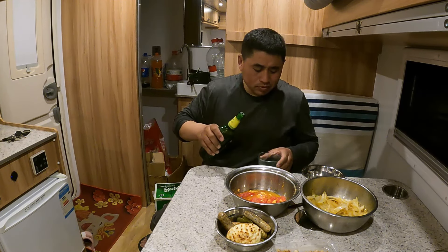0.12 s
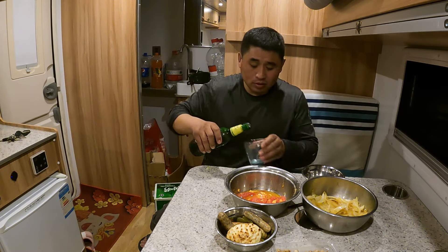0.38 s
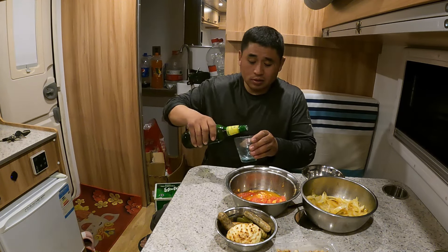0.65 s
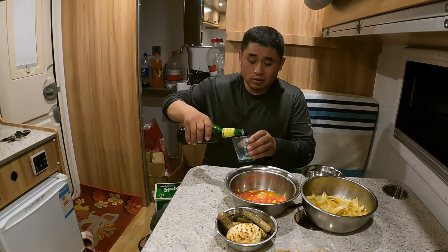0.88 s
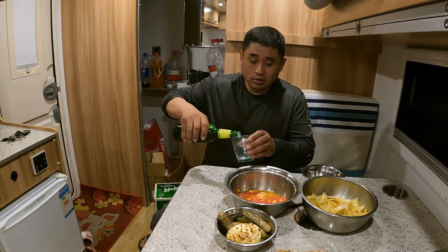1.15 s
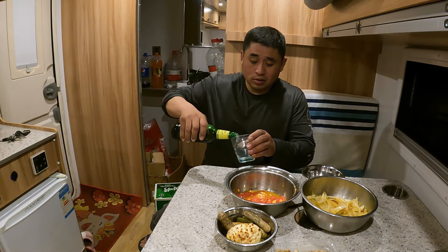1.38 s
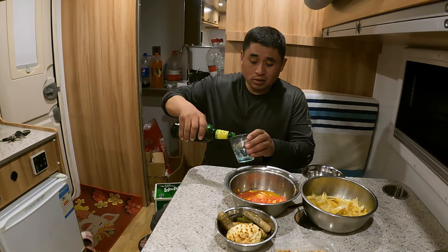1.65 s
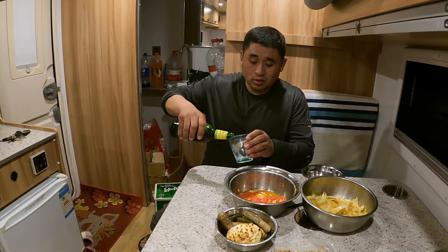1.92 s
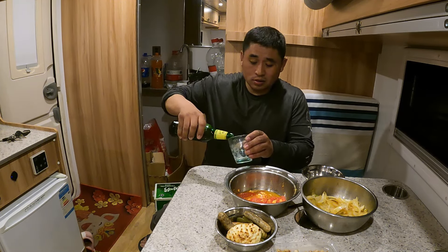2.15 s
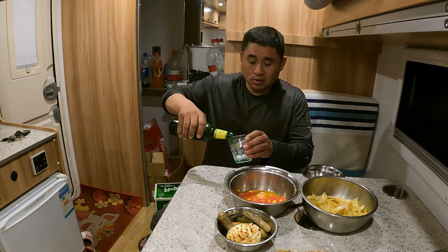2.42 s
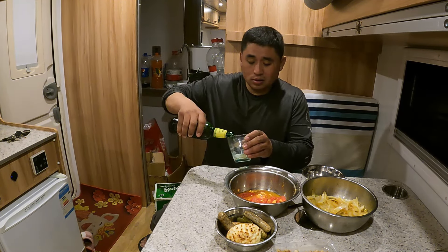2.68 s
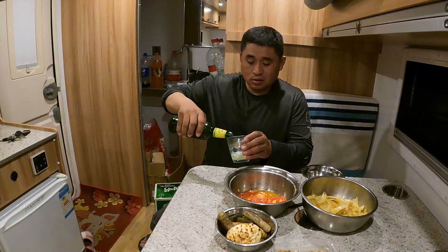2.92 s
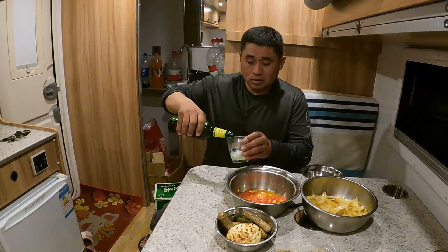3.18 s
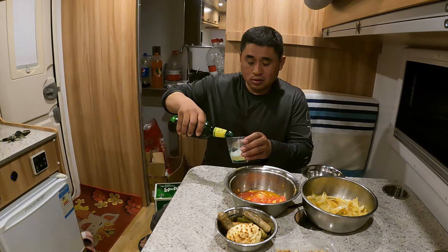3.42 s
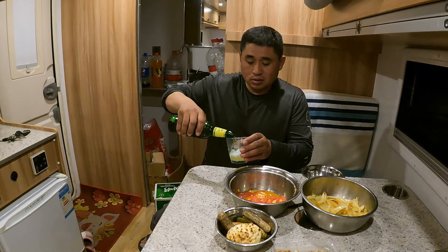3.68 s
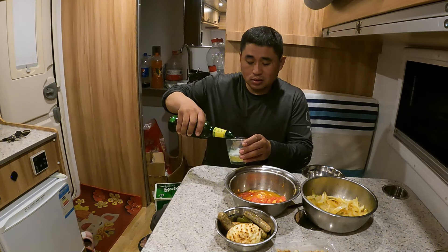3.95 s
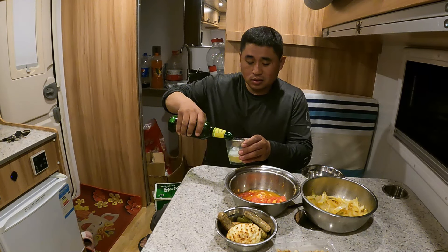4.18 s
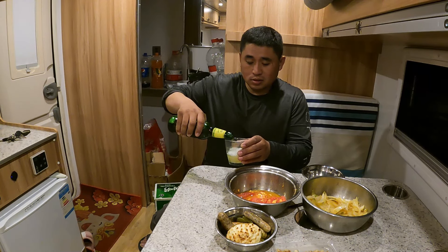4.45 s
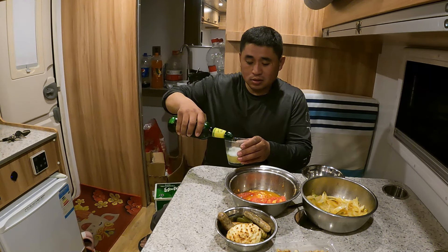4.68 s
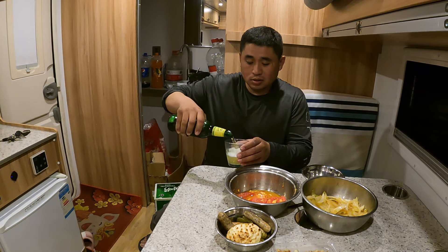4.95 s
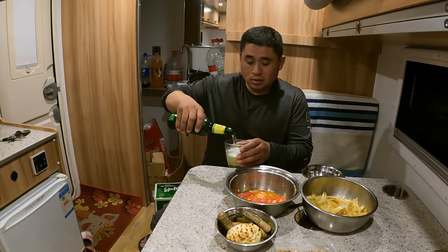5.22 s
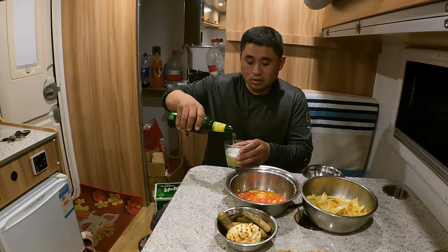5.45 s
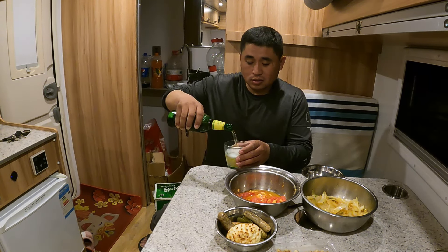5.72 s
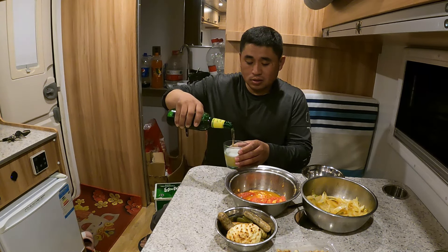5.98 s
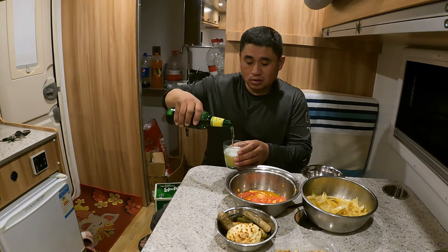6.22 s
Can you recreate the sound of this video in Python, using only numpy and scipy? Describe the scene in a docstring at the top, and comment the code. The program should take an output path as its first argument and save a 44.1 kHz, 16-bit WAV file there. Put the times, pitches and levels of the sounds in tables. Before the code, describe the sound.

A hard object thuds on a table and bounces once, then a bottle neck clinks on a glass and beer trickles faintly in a small hushed cabin.

```python
"""A small wood-lined cabin: a short bright scrape and faint glass hums, then a hard object is put down
on the table and bounces once (damped modes and booms). Beer is then poured slowly from a bottle into
a tilted glass: the neck clinks on the rim (ring groups), short ticks pop between (damped cavities),
soft taps fall on the table, and from 2.2 s the stream trickles faintly (rising bubbles).
Room hush, drone and low rumble (shaped noise) lie under all of it."""
import sys
import numpy as np
from scipy import signal
from scipy.fft import rfft, irfft
from scipy.io import wavfile
from scipy.ndimage import uniform_filter1d

SR = 44100
rng = np.random.default_rng(int(sys.argv[2]) if len(sys.argv) > 2 else 0)


def gain_from_decibels(decibels):
    """Convert decibel values to linear amplitude factors."""
    exponent = np.asarray(decibels, float) / 20
    return 10 ** exponent


def transcribe(signal):
    """Save signal, clipped to [-1, 1], as a 16-bit WAV file at the path in sys.argv[1]."""
    frames = np.atleast_2d(signal).T
    limited = np.clip(frames, -1, 1)
    pcm = np.round(limited * 32767).astype(np.int16)
    wavfile.write(sys.argv[1], SR, pcm)


N = 280035

# Likeness of left and right in noise and echoes. Each row: frequency in Hz, likeness from 0 to 1.
LIKENESS = [(60, .97), (250, .93), (600, .88), (1200, .8), (2000, .68), (4000, .65), (6500, .82),
            (8500, .94), (10300, .82), (12500, .15)]


def evened(x):
    """Scales to unit rms."""
    return x / np.sqrt(np.mean(x ** 2) + 1e-20)


def peaked(x, db):
    """Scales to a peak in dB."""
    return gain_from_decibels(db) * x / abs(x).max()


def read(points, hz):
    """Reads a (Hz, value) table on a log frequency axis."""
    f, value = np.transpose(points)
    return np.interp(np.log(hz + 1), np.log(f + 1), value)


def curve(points):
    """A (seconds, value) table at every sample."""
    return np.interp(np.arange(N) / SR, *np.transpose(points))


def add(mix, s, sound):
    """Adds a sound at s seconds, cut at the end of the mix."""
    part = mix[round(s * SR):][:len(sound)]
    part += sound[:len(part)]


def hump(hz, centre_hz, width_hz):
    """A steep resonance curve."""
    return 1 / (1 + (2 * (hz - centre_hz) / width_hz) ** 2)


def ring(hz, db, t60, rise=0.00046):
    """A dying sine that swells in while the contact lasts; t60 and rise in seconds."""
    t = np.arange(SR // 2) / SR
    swell = 1 - np.exp(-(t / rise) ** 2)
    return swell * gain_from_decibels(db - 60 * t / t60) * np.sin(2 * np.pi * hz * t)


def burst(colour, t60):
    """A puff of noise of the given magnitude spectrum that dies by 60 dB in t60 seconds."""
    t = np.arange(SR // 2) / SR
    puff = irfft(rfft(rng.standard_normal(len(t))) * colour)
    return evened(puff) * gain_from_decibels(-60 * t / t60)


def chatter(seconds, count):
    """One contact followed by a few weaker random ones."""
    out = np.zeros(round(.05 * SR))
    when, size = rng.random(count), rng.standard_normal(count)
    np.add.at(out, (when * seconds * SR).astype(int), 0.4 * size * (1 - when))
    out[0] = 1
    return out / np.linalg.norm(out)


def lumps(seconds):
    """Slow random drift of unit rms."""
    size = round(seconds * SR)
    return evened(uniform_filter1d(uniform_filter1d(rng.standard_normal(N), size), size))


def noise(gain, patchy_db, size=1024):
    """Stereo noise from random short-time spectra, gain(Hz) in magnitude, with drifting patches."""
    # Left-right balance of the noise. Each row: frequency in Hz, left minus right in dB.
    balance = [(60, 1.7), (180, 2), (550, 0), (1650, 4), (4970, 2.1), (8500, 1), (10500, 1.5),
               (13000, 11.5)]
    frames, hz = 4 * N // size + 5, np.fft.rfftfreq(size, 1 / SR)
    a, b, c, d, patches = rng.standard_normal((frames, len(hz), 5)).T
    patches = uniform_filter1d(patches, size=12, axis=0)
    patches = evened(uniform_filter1d(patches, size=10, axis=1))
    alike = read(LIKENESS, hz)[:, None]
    left, other = a + 1j * b, c + 1j * d
    z = np.array([left, alike * left + np.sqrt(1 - alike ** 2) * other])
    z *= gain(hz)[:, None] * gain_from_decibels(patchy_db * patches)
    z *= gain_from_decibels(np.outer([.5, -.5], read(balance, hz)))[:, :, None]
    return evened(signal.istft(z, nperseg=size, noverlap=3 * size // 4)[1][:, :N])


def knocks():
    """A blunt blow: a few cycles of the object itself, then the table top rings and booms."""
    # Knocks on the table. Each row: start in seconds, blow peak in dB, boom in dB re that peak.
    knock_rows = [(0.131, -33.5, -50), (0.1425, -7, -26), (0.276, -12, -30.5)]
    # Modes the blow sets ringing; the strongest lies near 1.1 kHz. Each # row: frequency in Hz, level in dB re
    # the other modes, t60 in seconds.
    knock_modes = [(143.5, -36, 0.18), (293, -5.5, 0.28), (460, -39, 0.75), (599.4, 3.5, 0.14),
                   (685, -8, 0.25), (923, -3, 0.063), (1080, 16, 0.046), (1240, -20.5, 0.27),
                   (1340, -1.5, 0.11), (1445, -66, 4), (1720, -26.5, 0.41), (2120, -41, 0.2),
                   (2100, -35.5, 0.15), (2270, -50, 0.17)]
    # Faint singing of the handled glass. Each row: start in seconds, frequency in Hz, level in dB,
    # t60 in seconds.
    hum_rows = [(0.024, 4700, -42, 0.067), (.075, 6100, -54, 0.12), (.085, 3523, -64.5, 0.48),
                (.215, 1580, -32.5, 0.14)]
    blow = ring(1175, 0, 0.011, rise=0.00045) + ring(1663, -2.6, 0.013, rise=0.00067)
    blow += ring(2350, -2.5, .006, rise=0.0022)
    body = blow + gain_from_decibels(-26) * sum(ring(*mode) for mode in knock_modes)
    soft = signal.convolve(body, signal.windows.hann(20))[:len(body)]  # contact lasts half a millisecond
    f, out = np.fft.rfftfreq(len(body), 1 / SR), np.zeros(N)
    boom_colour = hump(f, 236, 300) ** 2 * f / (f + 60)
    rattle_colour = hump(f, 1000, 2100) ** 2 * (f > 400)
    for s, db, boom_db in knock_rows:
        boom = ring(142, -1.1, 0.33, rise=0.0035) + ring(242, 0, 0.2, rise=0.0061)
        boom += gain_from_decibels(1.5) * burst(boom_colour, 0.2)
        add(out, s, peaked(soft, db) + gain_from_decibels(db + boom_db) * boom)
        add(out, s, gain_from_decibels(db - 52) * burst(f > 4000, 0.06))  # grit under the base
        add(out, s, gain_from_decibels(db - 27.5) * burst(rattle_colour, 0.19))  # things on the table rattle
    for s, *mode in hum_rows:
        add(out, s, ring(*mode, rise=.012))
    return out


def clinks():
    """Glass on glass: where the neck lands decides how strongly each group of rings sounds."""
    # Bottle neck on the rim. Each row: start in seconds, peak in dB, main ring in Hz,
    # low ring in dB, upper rings in dB (both re the main ring).
    clink_rows = [(.065, -40, 1660, 8, -3), (0.106, -38, 1596, -3, -14), (1.2004, -38, 1550, 1.5, -36),
                  (1.292, -25.5, 1570, -4.5, -13), (1.4638, -26, 1626, -16, 0),
                  (1.548, -27, 1646, -3.5, -9.5), (1.599, -42, 1780, 6, -21),
                  (2.846, -33.5, 1732, -1.5, -10.5), (2.883, -34, 1576, 14.5, 6),
                  (2.987, -50.5, 1670, 10.5, 2), (3.334, -40, 1730, 24, 13), (3.837, -46, 1780, -14, 2),
                  (3.855, -42, 1750, 8, -5.5), (3.881, -40.5, 1750, -13, 6), (3.895, -39, 1900, -2, -20),
                  (3.933, -42.5, 1740, -4.5, -10.5), (3.96, -46.5, 1800, 1, -4), (3.995, -46, 1860, 0, -10),
                  (4.02, -50, 1857, -7, -10), (4.045, -50, 1670, 8, 1), (4.172, -37, 1678, -11, -4),
                  (4.18, -39, 1665, -10, -5.5), (4.212, -37, 1664, -5.5, -3.5)]
    # Rings of the hand-damped glass. Each row: nominal frequency in Hz, level in dB re its group,
    # t60 in seconds.
    glass_rings = [(700, -12, .03), (2350, -8, .025), (2780, -6, .025), (6190, 0, .06), (9770, -3, .04),
                   (11100, -8, .04), (13200, -10, .05), (14390, -6, .07)]
    # Grit spectra, one list each for the upper and treble groups. Each row: frequency in Hz, level in dB.
    grit_colours = [
        [(500, -59), (1200, -1.5), (2500, -5.5), (3600, -1.5), (4400, -14.5), (5500, -31)],
        [(3500, -5), (5000, -3), (6500, -2.5), (9500, -5), (12500, -3.5), (15500, -4)],
    ]
    # The low ring rises once beer is in the glass. Each row: time in seconds, frequency in Hz.
    low_ring_hz = [(1.6, 994), (2.8, 1035)]
    out, f = np.zeros(N), np.fft.rfftfreq(SR // 2, 1 / SR)
    for s, db, hz, low_db, upper_db in clink_rows:
        spread = 1 + .015 * rng.standard_normal()  # varies from blow to blow
        low_hz = np.interp(s, *np.transpose(low_ring_hz)) * spread
        treble_db = upper_db - 18.5 - 0.56 * low_db  # duller after a blow rich in low ring
        sound = ring(hz, 0, 0.048) + ring(1.7 * hz, upper_db - 10.5, .02)
        sound += ring(low_hz, low_db, .05, rise=0.00094)
        sound += ring(1.12 * low_hz, low_db - 7.5, 0.051)  # weaker partner just above
        sound += ring(2.19 * hz, upper_db - 5, 0.04, rise=0.00024)  # next bending mode of the wall
        for mode_hz, mode_db, t60 in glass_rings:
            detune = rng.standard_normal()
            level_db = mode_db + (treble_db if mode_hz > 5000 else upper_db)
            mode = ring(mode_hz * (1 + 0.0038 * detune), level_db, t60, rise=0.0001)
            sound += np.sign(detune) * mode
        for group_db, colour in zip((upper_db, treble_db), grit_colours):
            sound += gain_from_decibels(group_db + 1.5) * burst(gain_from_decibels(read(colour, f)), 0.028)
        add(out, s, peaked(signal.oaconvolve(sound, chatter(.016, count=12)), db))
    return out


def ticks():
    """A rough click into a damped cavity and its overtone, with body, thump and a snap above the cavity."""
    # Pops of a small cavity. Each row: start in seconds, peak in dB, cavity in Hz, body in dB,
    # snap in dB (both re the cavity).
    tick_rows = [(.0085, -28.5, 2060, -6, -1), (.517, -40.5, 4320, -31, 4.5), (2.6212, -27, 1895, 7, 0),
                 (2.811, -42, 3430, -22, -2), (3.266, -30, 2080, -4.5, -8), (3.809, -30.5, 2396, -9, -5.5),
                 (4.133, -30, 2030, -7.5, -15.5), (4.422, -33, 2006, -6.5, -17.5),
                 (4.486, -33.5, 4020, 7.5, -10.5), (4.968, -37, 2650, -7, -12.5),
                 (5.323, -33.5, 3540, -12, -8.5)]
    # Dull part of a pop. Each row: frequency in Hz, width in Hz, relative level in dB.
    thump_modes = [(379, 256, 7.5), (567, 300, 6), (950, 28, -14.5)]
    # Snap spectrum. Each row: frequency in Hz, level in dB.
    snap_colour = [(300, -39), (1500, 12), (3000, 8.5), (6000, 2.5), (9000, -2.5), (11000, -13.5),
                   (15500, -7.5)]
    out, f = np.zeros(N), np.fft.rfftfreq(SR // 2, 1 / SR)
    thump = sum(ring(hz, db, 5.03 / width_hz) for hz, width_hz, db in thump_modes)
    for s, db, hz, body_db, snap_db in tick_rows:
        thump_db = -15.5 + 0.71 * body_db  # follows the body
        overtone_db = 3.5 + 1.55 * snap_db  # follows the snap
        highpass = 1 / (1 + (0.53 * hz / (f + 1)) ** 4)
        crackle = burst(gain_from_decibels(read(snap_colour, f)) * highpass, 0.03)
        # t60 of 58 cavity cycles; the overtone's is 40
        cavity = ring(hz, 0, 58 / hz, rise=.0006) + ring(2.05 * hz, overtone_db, 40 / hz, rise=.0001)
        body = ring(1119, body_db, 0.042, rise=.0008)
        pop = body + gain_from_decibels(thump_db) * thump + gain_from_decibels(snap_db) * crackle
        rough = signal.oaconvolve(pop, chatter(.006, count=6))[:len(pop)]
        add(out, s, peaked(cavity + rough, db))
    return out


def pour():
    """Many small bubbles that rise in pitch; higher ones grow with the brightness of the stream."""
    # The stream into the glass. Each row: time in seconds, level in dB once the fade-in is over.
    stream_level = [(2.2, -62), (2.8, -91.5), (3.15, -66), (3.55, -73.5), (3.75, -87), (4.04, -77),
                    (5.14, -72), (6.35, -74.5)]
    t, out = np.arange(N) / SR, np.zeros(N)
    bright = np.clip((t - 3.2) / 0.38, 0, 1)  # brightens as the bottom of the glass is covered
    for k, hz in enumerate(np.geomspace(950, 2900, 24)):
        u = np.linspace(0, 1, round(9.0 * SR / hz))
        bubble = np.sin(2 * np.pi * 9.66 * (u + 0.021 * u ** 2)) * np.sqrt(u) * np.exp(-4.0 * u)
        train = (rng.random(N) < 160 / SR) * gain_from_decibels(2.23 * rng.exponential(1, N))  # 160 a second
        out += signal.oaconvolve(train * gain_from_decibels(-k * (1 - bright)), bubble)[:N]
    fade_in = np.clip(t - stream_level[0][0], 0, .5) * 2
    return evened(out) * fade_in * gain_from_decibels(curve(stream_level))


def taps():
    """A soft blow on the table that rings a few low cycles with a puff around them."""
    # Dull taps. Each row: start in seconds, peak in dB, frequency in Hz.
    tap_rows = [(2.622, -48, 342), (4.488, -45.5, 487), (5.33, -54, 578), (6.104, -50, 330)]
    t60_s = 0.053
    out, f = np.zeros(N), np.fft.rfftfreq(SR // 2, 1 / SR)
    for s, db, hz in tap_rows:
        puff = gain_from_decibels(-2.5) * burst(hump(f, 0.94 * hz, 800) ** 2 * (f > hz / 2), t60_s)
        add(out, s, peaked(ring(hz, 0, t60_s, rise=0.0015) + puff, db))
    return out


def scrape():
    """A short bright drag, shaped noise, that starts with a jolt and fades as the object is lifted."""
    # Scrape spectrum. Each row: frequency in Hz, level in dB.
    scrape_colour = [(290, -57.5), (500, -22), (788, -0.5), (1450, -0.5), (4600, -2), (9000, -14.5),
                     (11900, -25), (15000, -51)]
    jolt_s, jolt_db, jolt_rise_s, jolt_t60_s = 0.0094, -33, 0.0014, 0.11
    drag_db, drag_end_s, drag_fade_s = -58, .145, .01
    t = np.arange(N) / SR
    since = t - jolt_s
    jolt = gain_from_decibels(jolt_db - 60 * np.maximum(since, 0) / jolt_t60_s)
    jolt *= np.exp(np.minimum(since, 0) / jolt_rise_s)
    drag = gain_from_decibels(drag_db) * np.clip((drag_end_s - t) / drag_fade_s, 0, 1)
    hiss = noise(lambda hz: gain_from_decibels(read(scrape_colour, hz)), patchy_db=2, size=256)
    return hiss * (jolt + drag)


def hush():
    """The air of the room as shaped noise, with a low drone and a lumpy two-band rumble."""
    # Air spectrum. Each row: frequency in Hz, level in dB.
    air_colour = [(90, -20), (270, 0), (420, -16.5), (560, -19.5), (740, -13.5), (860, -25.5), (1060, -3.5),
                  (1250, -12.5), (1750, -15.5), (2000, -16), (3000, -21.5), (4800, -15.5), (8400, -13.5),
                  (10200, -30), (12800, -42.5), (14000, -47.5), (15500, -72)]
    # The air grows as foam builds up. Each row: time in seconds, rms level in dB.
    air_level = [(0.0, -60), (1.2, -60), (3.5, -57.5), (6.35, -56.5)]
    # Low room drone. Each row: time in seconds, rms level in dB.
    drone_level = [(0.6, -73), (1.0, -67.5), (2.8, -60), (3.8, -64), (5.3, -58.5), (6.35, -63)]
    # Drone resonances. Each row: frequency in Hz, width in Hz, relative level in dB.
    drone_peaks = [(185, 100, 1), (252.8, 24, 6.5)]
    # Strongest rumble swells. Each row: centre in seconds, 1/e half-length in seconds,
    # deep level in dB, upper level in dB.
    swell_rows = [(1.08, 0.042, -62, -86), (1.235, 0.06, -68, -61.5), (1.587, .12, -68.5, -81.5),
                  (2.116, 0.065, -64, -76), (2.44, 0.091, -56.5, -72), (2.883, 0.079, -53.5, -68),
                  (3.32, 0.047, -67, -62), (3.594, .08, -65, -72), (4.183, 0.2, -65, -66),
                  (4.864, 0.04, -59, -61.5), (5.186, 0.2, -59, -64), (5.84, .22, -74, -52)]
    air = noise(lambda hz: gain_from_decibels(read(air_colour, hz)), patchy_db=0.05)
    drone = noise(lambda hz: sum(gain_from_decibels(db) * hump(hz, f, w) for f, w, db in drone_peaks),
                  patchy_db=3.0, size=2048)
    deep = noise(lambda hz: hump(hz, 27.6, 34) ** 2, patchy_db=3.8, size=4096)
    upper = noise(lambda hz: hump(hz, 64, 80) ** 2, patchy_db=4.6, size=2048)
    t, out = np.arange(N) / SR, air * gain_from_decibels(curve(air_level)) + drone * gain_from_decibels(curve(drone_level))
    for band, column, floor_db in ((deep, 2, -80.5), (upper, 3, -81.5)):
        swells = sum(gain_from_decibels(row[column]) * np.exp(-((t - row[0]) / row[1]) ** 2) for row in swell_rows)
        out += band * (gain_from_decibels(floor_db + 8 * lumps(0.14)) + swells)  # the floor heaves by 8 dB rms
    return out


def cabin(x):
    """Sparse echoes of random sign, each band dying at its own speed; both sides share part of them."""
    # Reverberation. Each row: frequency in Hz, t60 in seconds.
    cabin_t60 = [(150, .3), (600, 0.17), (1500, 0.12), (4000, 0.16), (10000, 0.17)]
    echoes = np.zeros((2, SR // 2))
    slots = np.arange(130, SR // 2 - 20, 20)
    at = slots + rng.integers(0, 20, (2, len(slots)))
    np.put_along_axis(echoes, at, rng.choice([-1., 1.], at.shape), 1)
    hz, t, z = signal.stft(echoes, SR, nperseg=128)
    alike = read(LIKENESS, hz)[:, None]
    z[1] = alike * z[0] + np.sqrt(1 - alike ** 2) * z[1]
    cluster = 1 + 0.26 * np.exp(-((t - .017) / 0.0035) ** 2)  # strong echoes off the far wall
    decay = gain_from_decibels(-60 * t / read(cabin_t60, hz)[:, None])
    tail = signal.istft(z * cluster * decay, SR, nperseg=128)[1]
    return signal.fftconvolve(x[None], tail / np.linalg.norm(tail[0]), axes=1)[:, :N]


def microphone(x):
    """The frequency response of the microphone as a linear-phase filter."""
    # Response. Each row: frequency in Hz, gain in dB.
    response = [(60, 12), (120, -0.5), (9000, 6), (11000, -8.5), (15000, -24.5), (16000, -47)]
    colour = gain_from_decibels(read(response, np.fft.rfftfreq(1024, 1 / SR)))
    return signal.oaconvolve(x, np.roll(irfft(colour), 512)[None], "same", axes=1)


def ports(x):
    """The two openings of the microphone shift the mid range of each side in phase."""
    # Phase between the ports. Each row: frequency in Hz, radians by which left leads.
    port_phase = [(400, 0), (1100, -.45), (2000, -.7), (4000, -.25), (6500, 0), (10500, 0), (12500, .4)]
    turn = np.outer([.5j, -.5j], read(port_phase, np.fft.rfftfreq(N, 1 / SR)))
    return irfft(rfft(x) * np.exp(turn), N)


def scene():
    """Pans the sources (left, right in dB), adds their echoes, then scrape and hush."""
    table, glass, pops, stream = knocks(), clinks(), ticks() + taps(), pour()
    near = table * gain_from_decibels([[-1.2], [1.2]])
    near = near + (glass + stream) * gain_from_decibels([[.3], [-.3]])
    near += pops * gain_from_decibels([[.2], [-.2]])
    far = cabin(gain_from_decibels(-2) * table)
    far += cabin(gain_from_decibels(2.0) * glass + gain_from_decibels(7) * stream)
    far += cabin(gain_from_decibels(1.0) * pops)
    return ports(microphone(near + far) + scrape() + hush())


def top_cut(x):
    """Nothing passes above the cut-off."""
    return signal.sosfilt(signal.butter(12, 15590, fs=SR, output="sos"), x)


def record(dry):
    """Gain control: the level dips by 0.04 dB per dB of tracked power over -26.5 dB."""
    power_db = 10 * np.log10(abs(uniform_filter1d((dry ** 2).mean(0), size=400)) + 1e-12)
    fall_db = np.arange(N) * 60 / SR  # the tracked power falls 60 dB a second
    tracked_db = np.maximum.accumulate(power_db + fall_db) - fall_db
    over_db = np.maximum(tracked_db + 26.5, 0)
    mix = dry / gain_from_decibels(0.04 * uniform_filter1d(over_db, size=200))
    return top_cut(mix)


dry = scene()
out = record(dry)
transcribe(out)
```